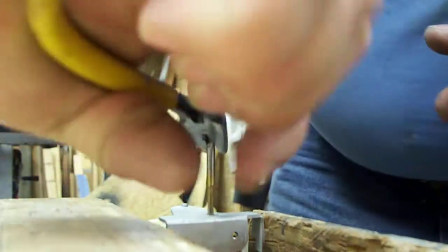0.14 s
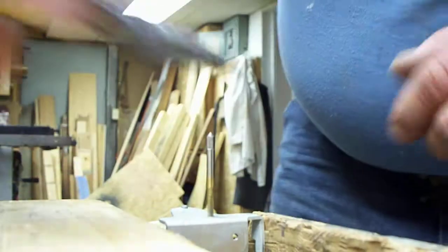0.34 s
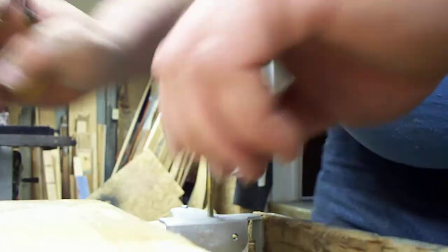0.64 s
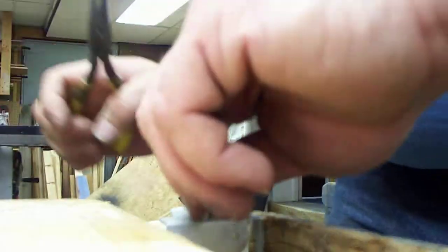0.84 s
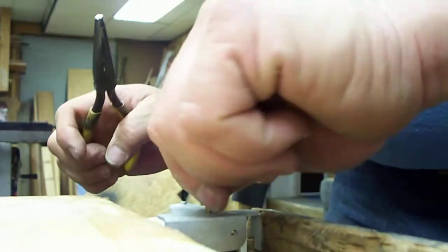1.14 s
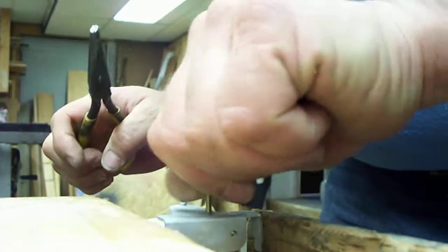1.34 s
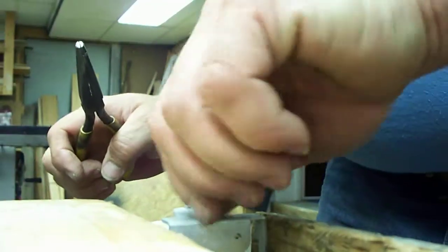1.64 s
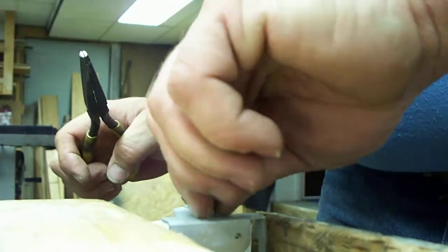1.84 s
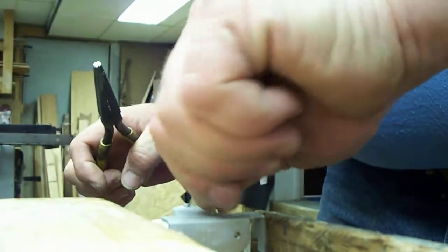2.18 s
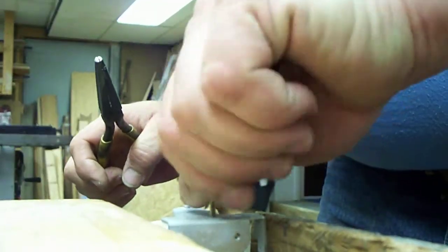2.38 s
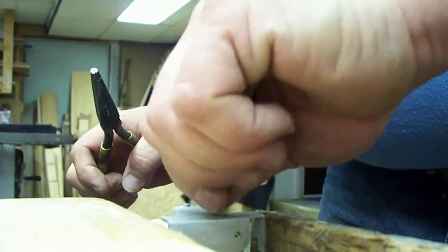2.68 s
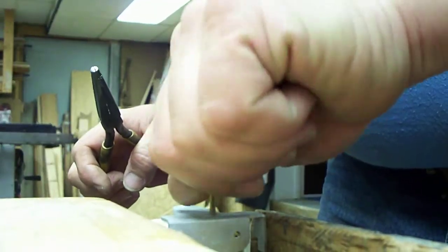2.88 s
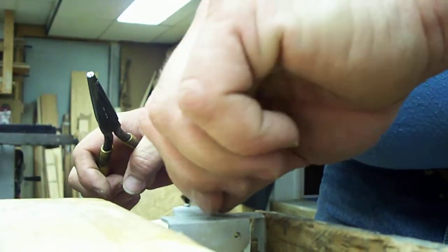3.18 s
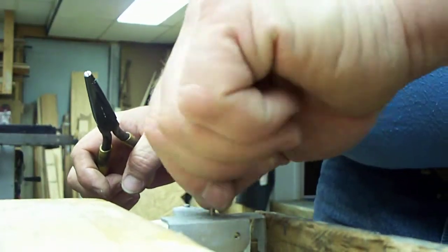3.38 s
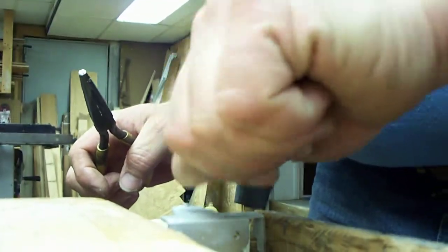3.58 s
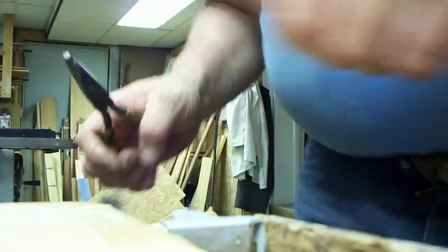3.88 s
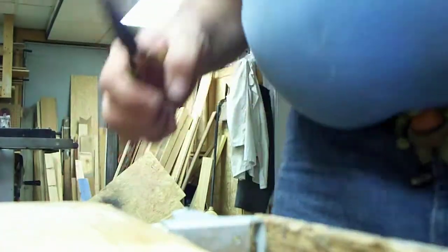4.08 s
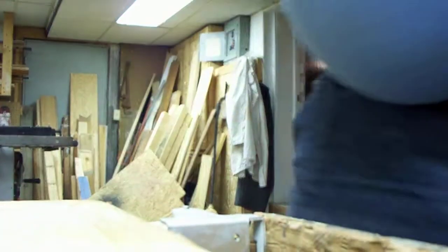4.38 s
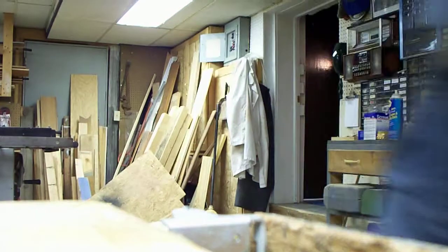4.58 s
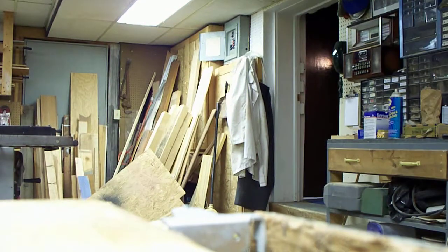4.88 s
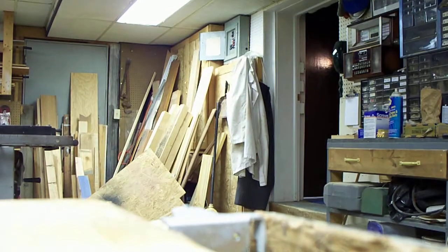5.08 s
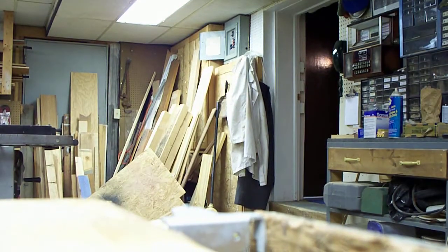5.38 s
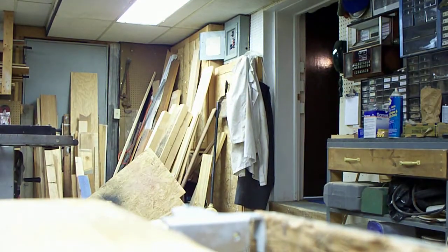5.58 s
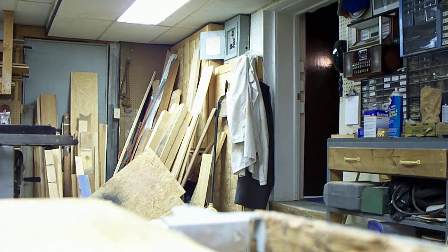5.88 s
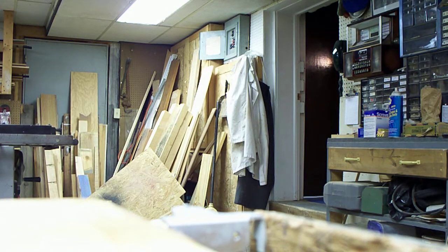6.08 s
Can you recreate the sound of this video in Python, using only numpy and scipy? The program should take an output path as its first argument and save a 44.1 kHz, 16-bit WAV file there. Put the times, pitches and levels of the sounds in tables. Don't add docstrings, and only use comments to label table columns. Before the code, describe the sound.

Sparse steel clicks and gritty scrapes rattle a thin metal box in a small, fairly dry workshop, amid soft rubbing and cloth rustle. The cheap close microphone adds irregular ticking interference, hum and thin whine. After some faint ticks, one tool hits the bench far louder than anything before, bouncing and ringing briefly. Everything then grows quieter until hollow wooden knocks and rustling arrive from across the room.

```python
import sys
import numpy as np
from scipy import signal
from scipy.fft import rfft, irfft, next_fast_len
from scipy.io import wavfile
from scipy.ndimage import uniform_filter1d, map_coordinates

SR = 44100
rng = np.random.default_rng(int(sys.argv[2]) if len(sys.argv) > 2 else 0)


def dump(signal):
    limited = np.clip(np.atleast_2d(signal).T, -1, 1)
    pcm = np.round(limited * 32767).astype(np.int16)
    wavfile.write(sys.argv[1], SR, pcm)


def gain_from_decibels(decibels):
    exponent = np.asarray(decibels, float) / 20
    return 10 ** exponent


N = 274743

# start in seconds, peak level in dB, bench level relative in dB,
# ring frequency in Hz, t60 in seconds
DROP_HITS = [
    (4.9973, -13.5, -6.5, 7000, 0.014),
    (4.9990, -9.5, -8, 6200, 0.019),
    (5.005, -28, 13, 6900, 0.078),
    (5.0118, -35.5, 13.5, 7000, 0.18),
    (5.0194, -34, 17.5, 7550, 0.062),
    (5.0232, -21.5, 2, 7700, 0.025),
    (5.040, -31, 5, 7400, 0.12),
]
# middle in seconds, length in seconds, rub rise in dB, rustle rise in dB
MOVES = [(0.087, .25, 0, 8), (0.671, .2, 4.5, 5.5), (1.364, 0.41, 3.5, 5.5), (2.13, 0.28, 3.5, 3),
         (2.992, 0.11, 2.5, 4.5), (3.493, 0.17, 3.5, 4.5), (4.03, 0.38, 5.5, 4), (4.357, 0.21, 8.5, 5),
         (4.599, 0.22, 10.5, 10), (4.913, 0.22, 6.5, 6), (6.11, 0.19, 13, 9)]


def unit(x):
    return x / np.sqrt(np.mean(x ** 2) + 1e-20)


def along(points, hz):
    f, v = np.transpose(points)
    return np.interp(np.log(hz + 1), np.log(f + 1), v)


def wobble(rate):
    knots = rng.standard_normal(int(N * rate / SR) + 4)
    return map_coordinates(knots, [np.arange(N) * rate / SR])


def filtered(x, response):
    m = next_fast_len(len(x) + 8192)
    return irfft(rfft(x, m) * response(np.fft.rfftfreq(m, 1 / SR)), m)[:len(x)]


def modes(table, turn=-1):
    def resonance(f, hz, width, db):
        return gain_from_decibels(db) * 1j * f * width / (hz * hz - f * f + 1j * f * width)
    return lambda f: sum(turn ** k * resonance(f, *row) for k, row in enumerate(table))


def add(track, s, piece):
    part = track[round(s * SR):][:len(piece)]
    part += piece[:len(part)]


def swells(rows):
    clock = np.arange(N) / SR
    return sum(db * np.exp(-((clock - s) / (length / 2)) ** 2) for s, length, db in rows)


def ducking_db():
    duck_db, fall_s = -7, .15
    return duck_db * np.clip((np.arange(N) / SR - DROP_HITS[0][0]) / fall_s, 0, 1)


def gain_return_db():
    start_s, rise_db = 6.013, 5
    return rise_db * (np.arange(N) / SR > start_s)


def room(x):
    # frequency in Hz, t60 in seconds
    decay = [(200, 0.14), (1500, 0.078), (7000, 0.26)]
    hz, t, z = signal.stft(rng.standard_normal(SR // 2), SR, nperseg=256)
    fade = gain_from_decibels(-60 * t / along(decay, hz)[:, None])
    tail = signal.istft(z * fade, SR, nperseg=256)[1]
    return signal.fftconvolve(np.pad(x, (200, 0)), tail / np.linalg.norm(tail))[:N]


def rush(spectrum, patchy_db):
    z = signal.stft(rng.standard_normal(N), nperseg=256)[2]
    field = uniform_filter1d(rng.standard_normal(z.shape), size=4, axis=0)
    field = uniform_filter1d(field, size=6, axis=1)
    x = signal.istft(z * gain_from_decibels(patchy_db * unit(field)), nperseg=256)[1][:N]
    return unit(filtered(x, lambda hz: gain_from_decibels(along(spectrum, hz))))


def rings(table):
    waver_per_s, beat_db, drift_rad = 130, 2.5, .7
    out, t = np.zeros(N), np.arange(SR // 5) / SR
    for s, hz, db, t60 in table:
        knots = rng.standard_normal((2, 40))
        beat, drift = [np.interp(t, np.arange(40) / waver_per_s, row) for row in knots]
        level = gain_from_decibels(db + beat_db * beat - 60 * t / t60)
        ring = level * np.sin(2 * np.pi * hz * t + drift_rad * (drift - drift[0]))
        add(out, s, ring * (1 - np.exp(-t / 0.0006)))
    return out


def contact(db, body_db, rise, t60, body, kick, ring_hz=6900):
    # frequency in Hz, width in Hz, level in dB
    steel_modes = [(3320, 500, -6.5), (4904, 270, 1.5), (5700, 460, 4), (6900, 1200, 1), (7786, 250, 2.5)]
    t = np.arange(SR // 5) / SR
    lasts = max(t60, .004) * np.array([[.6], [1.1]])
    swell = np.minimum(t / max(rise, 1e-4), 1) ** 2 * gain_from_decibels(-60 * np.maximum(t - rise, 0) / lasts)
    force = swell * rng.standard_normal((2, len(t)))
    grains = np.repeat(rng.standard_normal(len(t) // 40 + 1), 40)[:len(t)]
    force *= gain_from_decibels(3.0 * grains)
    force[0, 4] += 0.86 * kick
    force[1, 4:20] += .22 * kick * np.hanning(16)

    def steel(f):
        return modes(steel_modes)(f) * (1 + modes([(ring_hz, 500, 3)])(f))

    def panel(f):
        soft = 1 / (1 + 1j * f / 3500 - (f / 2800) ** 2)
        leak = (1j * f / (1j * f + 0.75 * body[0][0])) ** 2
        return modes(body, turn=1)(f) * soft ** 2 * leak

    bright, dull = filtered(force[0], steel), filtered(force[1], panel)
    return gain_from_decibels(db) * (bright / np.abs(bright).max() + gain_from_decibels(body_db) * dull / np.abs(dull).max())


def spike_times():
    routine = [0.0048, 0.0134, 0.0402, 0.1076, 0.1268, 0.204, 0.2136, 0.2746, 0.2836, 0.3074, 0.3396,
               0.3828, 0.3942, 0.4052, 0.4408, 0.5074, 0.5138, 0.5414, 0.572, 0.5922, 0.6048, 0.707, 0.741,
               0.783, 0.805, 0.8398, 0.9064, 0.9164, 0.9408, 0.9934]
    # start in seconds, number of spikes, gap in seconds
    runs = [(0.2407, 2, 0.0075), (0.3753, 6, 0.0093), (0.5099, 1, 0.009), (0.5283, 1, 0.0075),
            (0.6505, 2, 0.0086), (0.674, 3, 0.0097), (1.0449, 1, 0.009), (1.2379, 3, 0.0085),
            (1.3751, 3, 0.0093), (1.9444, 1, 0.009), (2.0435, 1, 0.009), (2.1931, 2, 0.0132),
            (2.3065, 3, 0.0093), (2.7473, 4, 0.012), (3.0039, 2, 0.0115), (3.4586, 1, 0.01),
            (3.4807, 2, 0.01), (3.5068, 3, 0.0093), (3.6078, 2, 0.0075), (3.909, 2, 0.0023),
            (3.9917, 5, 0.0093), (4.1415, 2, 0.0093), (4.2085, 1, 0.009), (4.6036, 3, 0.01),
            (4.6921, 3, 0.011), (4.8185, 4, 0.0093), (4.8715, 3, 0.0093), (5.2379, 2, 0.0075),
            (5.3712, 3, 0.0075), (5.7038, 3, 0.0075), (5.8097, 2, 0.0085), (6.0019, 2, 0.01)]
    # start in seconds, length in seconds
    idle = [(.1, .04), (.272, .071), (.565, .01), (.78, .028), (.988, .01), (1.198, .01), (1.334, .01),
            (1.587, .01), (1.702, .01), (2.278, .01), (2.388, .01), (2.586, .012), (3.035, .01),
            (3.535, .01), (.536, .01), (3.335, .049), (3.565, .01), (4.378, .008), (4.435, .008),
            (4.508, .008), (4.778, .028), (4.91, .008), (5.269, .039), (5.434, .008), (5.566, .026)]
    # first time in seconds, number of times
    chore_rows = [(1.494, 2), (1.6392, 2), (1.8124, 2), (2.244, 2), (2.7164, 2), (2.948, 1), (3.2925, 2),
                  (4.7478, 2)]
    strays = [.0739, .35, .5422, .5778, .726, .809, .849, 1.1394, 1.22, 1.291, 1.316, 1.352, 1.4111, 1.748,
              1.772, 1.987, 2.023, 2.092, 2.118, 2.1419, 3.0395, 3.0721, 3.1388, 3.342, 3.449, 3.7745,
              3.7928, 3.891, 3.9229, 3.9489, 4.091, 4.115, 4.225, 4.3245, 4.416, 4.481, 4.4895, 4.52,
              4.6437, 5.318, 5.348, 5.577, 5.771]
    period_s, busy_s, jitter_s = .9995, .012, .0002
    steps = np.add.outer(period_s * np.arange(7), routine).ravel()
    steps = steps + jitter_s * rng.standard_normal(len(steps))
    pauses = list(idle) + [(s - busy_s, (count - 1) * gap + 2 * busy_s) for s, count, gap in runs]
    free = [s for s in steps if s < N / SR and not any(a < s < a + length for a, length in pauses)]
    chores = [s + k * period_s for s, times in chore_rows for k in range(times)]
    extra = [s + k * gap for s, count, gap in runs for k in range(int(count))]
    return np.array(free + chores + list(strays) + extra)


def hum(spike_s):
    # frequency in Hz, density in dB per Hz
    spectrum = [(12, -53.5), (20, -14), (48, 1), (92, 5.5), (280, -3), (510, 2.5), (670, -7.5),
                (1100, -16.5), (1200, -12), (1560, -38), (2640, -120)]
    # frequency in Hz, width in Hz, level in dB
    air_modes = [(60, 4, -4.5), (238.1, 10, -0.5), (410.4, 23, -1.5)]
    # middle in seconds, length in seconds, rise in dB
    nudges = [(.125, 0.089, 11.5), (1.2, 0.06, 8), (2.2, 0.1, 5.5), (2.75, 0.14, 1.5), (6.18, 0.38, 2.5)]
    level_db = -59 + ducking_db() + 1.3 * gain_return_db() + swells(nudges)
    spikes = np.bincount(np.round(spike_s * SR).astype(int), minlength=N)
    load = np.minimum(signal.fftconvolve(spikes, np.hanning(2000), "same"), 1)
    sag_db = 6 * (load - .8) + 0.5 * wobble(30)
    air = unit(filtered(rng.standard_normal(N), lambda f: modes(air_modes)(f) ** 2))
    return gain_from_decibels(level_db - 0.5 + sag_db) * (rush(spectrum, patchy_db=0.5) + gain_from_decibels(-6.0) * air)


def rubbing_hands():
    # frequency in Hz, density in dB per Hz
    spectrum = [(410, -21.5), (700, -5), (1770, -11.5), (2030, -13), (2830, -18.5), (3450, -19.5),
                (4300, -38), (5590, -76), (9460, -120)]
    level_db = -65.5 + 0.51 * ducking_db() + 0.84 * gain_return_db()
    level_db = level_db + swells([row[:3] for row in MOVES])
    return gain_from_decibels(level_db + 1.8 * wobble(45)) * rush(spectrum, patchy_db=1.5)


def rustling_clothes():
    # frequency in Hz, density in dB per Hz
    spectrum = [(2410, -52.5), (4100, -15.5), (4280, -12.5), (4690, -8.5), (5320, -4), (6070, -2),
                (6760, 0), (8000, -2), (10400, -39.5), (17600, -120)]
    level_db = -70.5 + .7 * ducking_db() + .8 * gain_return_db()
    level_db = level_db + swells([(s, length, db) for s, length, _, db in MOVES])
    return gain_from_decibels(level_db + 0.32 * wobble(22)) * rush(spectrum, patchy_db=-2.5)


def whine():
    # frequency in Hz, level in dB
    tones = [(7777, -99), (7837, -74), (7897, -85.5)]
    clock, cycle_s = np.arange(N) / SR, .128
    cycle = np.cos(2 * np.pi * (clock - .004) / cycle_s)
    busy = 1 / (1 + np.exp(-2.5 * (cycle + .5 + .5 * wobble(20))))
    steady = sum(gain_from_decibels(db + 4) * np.sin(2 * np.pi * hz * clock) for hz, db in tones)
    return busy * gain_from_decibels(ducking_db()) * steady


def supply_blips(spike_s):
    faint = [.1841, .1686, 1.426, 1.1893, 2.1787, 2.4263, 2.4788, 2.6629, 2.6921, 2.8924, 2.9229, 3.0923,
             3.326, 3.811, 3.8245, 4.1321, 4.1764, 4.1868, 4.6684]
    # start in seconds, peak level in dB
    volleys = [(0.048, -41), (0.5513, -36), (0.938, -44.5), (1.038, -47), (1.55, -46), (2.037, -39.5),
               (2.551, -42), (3.047, -42.5), (3.5405, -36.5), (4.039, -36.5), (4.537, -38)]
    spike_db, duck_depth = -38.8, 1.25
    back_s, back_db = 5.995, 4.5
    t = np.arange(-40, 200) / SR
    pulse = 1.15 * np.exp(-np.abs(t / np.where(t < 0, .00017, .0002)) ** 1.8)
    rebound = .7 * (t > -.0002) * np.exp(-.5 * ((t - .00085) / .00047) ** 2)
    blip = pulse - rebound
    out = np.zeros(N)
    size_db = spike_db + duck_depth * ducking_db() + back_db * (np.arange(N) / SR > back_s)
    for s in spike_s:
        add(out, s + t[0], gain_from_decibels(size_db[round(s * SR)] + rng.normal(0, .8)) * blip)
    for s in faint:
        add(out, s + t[0], gain_from_decibels(spike_db - 7.5) * blip)
    for s, db in volleys:
        for k in range(4):
            add(out, s + t[0] + k * .0021, gain_from_decibels(db - 1.5 + rng.normal(0, 1.2)) * blip)
    return filtered(out, lambda f: 1.1 * f * f / (f * f + 90 ** 2) / (1 + (f / 3800) ** 4))


def far_knocks():
    # start in seconds, peak level in dB, edge level relative in dB, t60 in seconds
    knocks = [
        (1.69, -57, -24, 0.025),
        (4.654, -49, -21, 0.028),
        (6.046, -41.5, -28, 0.069),
        (6.103, -58, -28, 0.049),
        (6.1362, -35, -27, 0.046),
        (6.207, -35, -26, 0.038),
    ]
    # frequency in Hz, width in Hz, level in dB
    wood = [(803, 160, 11), (1240, 79, 8.5), (1500, 79, 5), (1830, 160, 1), (2490, 38, -27)]
    out = np.zeros(N)
    for s, db, edge_db, t60 in knocks:
        add(out, s, contact(db + edge_db + 3, -edge_db, .001, t60, wood, kick=9.0))
    return out


def murmurs():
    # middle in seconds, length in seconds, frequency in Hz, level in dB
    tones = [(2.41, .06, 388, -54.5), (2.493, 0.062, 406, -52.5), (2.657, 0.054, 404.7, -53.5),
             (2.763, 0.031, 414, -50), (2.949, 0.03, 408, -51), (3.049, 0.03, 398.4, -45.5),
             (3.057, 0.037, 265, -53), (3.791, 0.0077, 619, -40.5), (3.923, 0.011, 497, -42),
             (4.49, 0.012, 480, -48), (1.183, 0.0061, 1198, -37.5), (3.612, 0.041, 386, -53.5),
             (4.37, 0.079, 225.4, -54)]
    clock, out = np.arange(N) / SR, np.zeros(N)
    for s, length, hz, db in tones:
        swell = np.exp(-((clock - s) / (length / 2)) ** 2)
        out += gain_from_decibels(db) * swell * np.sin(2 * np.pi * hz * clock)
    return out


def scrapes():
    # start in seconds, peak level in dB, box level relative in dB,
    # rise in seconds, t60 in seconds
    slides = [(0.085, -46.5, 0.5, 0.006, 0.24), (0.1075, -38, -13, 0.0019, 0.028),
              (0.133, -31, -14.5, 0.003, 0.063), (0.1376, -30, -11.5, 0.0028, 0.036),
              (1.1765, -32.5, -8.5, 0.0033, 0.038), (1.972, -36, -6, 0.0054, 0.045),
              (2.1515, -29, -6, 0.008, 0.045), (2.557, -40, -4.5, 0.00093, 0.047),
              (2.639, -33.5, -7.5, 0.011, 0.041), (2.754, -34, -9.5, 0.0031, 0.05),
              (2.7675, -39.5, -9, 0.0034, 0.053), (2.83, -45, -11, 0.005, 0.08),
              (3.345, -27, -8.5, 0.0069, 0.061), (3.357, -33.5, -14, 0.0047, 0.04)]
    # start in seconds, peak level in dB,
    # box level relative in dB, t60 in seconds
    brushes = [(0.7016, -53, -17, 0.057), (0.84, -54, 1, 0.043), (1.056, -45.5, -4.5, 0.023),
               (1.161, -48.5, 0, 0.041), (1.465, -50, -21, 0.044), (1.763, -51.5, -1, 0.095),
               (2.2764, -65, -16, 0.041), (2.5774, -49, -6, 0.044), (2.9424, -54, 2.5, 0.017),
               (3.035, -53, 3.5, 0.057), (3.159, -56, -2, 0.051), (3.3988, -47.5, -2, 0.032),
               (3.4309, -51, 3.5, 0.15), (3.4385, -45, 0.5, 0.1), (3.4646, -48, -2, 0.013),
               (3.468, -57, 3, 0.048), (3.9266, -47.5, 0.5, 0.02), (6.0185, -48.5, -6, 0.029)]
    # frequency in Hz, width in Hz, level in dB
    rattle = [(935, 180, 7.5), (1250, 330, 12.5), (1687, 99, 9.5), (2420, 66, -7), (2750, 134, -2.5),
              (3600, 230, -9.5)]
    out = np.zeros(N)
    for s, db, box_db, rise, t60 in slides:
        add(out, s, contact(db + .5, box_db + 4.0, rise, t60, rattle, kick=0.0, ring_hz=6740))
    for s, db, box_db, t60 in brushes:
        add(out, s, contact(db + .5, box_db + 4.0, .0024, t60, rattle, kick=0.0, ring_hz=7400))
    return out


def snaps():
    # start in seconds, peak level in dB, box level relative in dB,
    # ring frequency in Hz, t60 in seconds
    sharp = [(0.0319, -37.5, -13.5, 6900, 0.0081), (0.0604, -44.5, -7, 7000, 0.017),
             (0.077, -26.5, -8.5, 6900, 0.041), (0.8172, -34.5, 1, 5700, 0.029),
             (1.4475, -32.5, 1.5, 5700, 0.023), (1.9503, -31, -1.5, 5560, 0.024),
             (2.1588, -26.5, -10.5, 6500, 0.055), (2.2517, -32, -1, 5400, 0.023),
             (3.6395, -30.5, -1.5, 5470, 0.015), (3.6445, -47, 11, 5700, 0.014),
             (3.9175, -65, 15, 5870, 0.018), (6.0473, -47, 5.5, 6970, 0.038)]
    # start in seconds, peak level in dB, box level relative in dB
    ticks = [(0.2648, -51, -14), (1.3679, -50, -4.5), (1.9025, -63, -4), (4.217, -61, 20.5),
             (4.2694, -42.5, -16), (4.2975, -51, -17), (4.3321, -49, -5), (4.3424, -48.5, -3),
             (4.3918, -48.5, -13), (4.531, -51, 10.5), (4.5626, -55, 5), (4.586, -49, -5),
             (6.0141, -52, -3), (4.3478, -50.5, -4), (4.3815, -51.5, -8), (4.315, -53.5, -6),
             (4.572, -52.5, 0), (4.582, -52.5, 1)]
    # frequency in Hz, width in Hz, level in dB
    box = [(563, 120, -2), (1307, 140, 9.5), (1580, 150, 10), (1844, 130, 6.5), (2076, 140, 8.5),
           (2570, 130, -3), (3180, 270, 2)]
    out = np.zeros(N)
    for s, db, box_db, ring_hz, t60 in sharp:
        add(out, s, contact(db + 2.5, box_db + 7, .0006, t60, box, kick=14.0, ring_hz=ring_hz))
    for s, db, box_db in ticks:
        add(out, s, contact(db + 1.5, box_db + 7, .0003, .014, box, kick=12.0, ring_hz=7000))
    return out


def tap():
    # start in seconds, frequency in Hz, level in dB, t60 in seconds
    jaws = [(.139, 6519, -38, .08), (.139, 7020, -41, .08), (.118, 4800, -50, .04), (.153, 620, -45, .1),
            (.108, 280, -44, .09), (.136, 470, -44, .05), (1.976, 6600, -44, .05), (5.1, 575, -58, .3),
            (.262, 1380, -59, .15), (1.18, 250, -48, .2), (.078, 2710, -32, .025), (3.917, 1400, -33, .022),
            (6.058, 7250, -60, .12), (6.095, 7300, -61, .15)]
    # start in seconds, frequency in Hz, level in dB, t60 in seconds
    wall = [(.8173, 1300, -31, 0.042), (.8173, 1950, -29, .03), (1.44784, 2090, -27, .022),
            (1.4478, 1800, -32.5, 0.028), (1.9503, 1290, -33.5, 0.047), (2.252, 1330, -35.5, 0.037),
            (2.252, 1530, -33.5, 0.038), (2.252, 2150, -35.5, 0.029), (3.6396, 1330, -34, .025),
            (3.6394, 1930, -31, .025), (3.6446, 1600, -34, 0.018), (1.9503, 1600, -37, .03),
            (1.9503, 2000, -37, 0.029), (6.048, 1700, -40, .03), (6.051, 500, -40.5, .03),
            (6.138, 780, -45, 0.11), (2.1595, 2730, -30.5, 0.028), (2.165, 2350, -43, .05),
            (2.159, 5770, -35.5, .03), (2.159, 4400, -39, .03), (2.159, 950, -40, 0.053),
            (2.161, 6590, -39.5, .05), (.134, 7900, -36.5, .04), (.0775, 1300, -37, 0.022),
            (.0775, 1730, -31, .035), (.078, 5800, -40, .04), (3.359, 2900, -39, 0.044),
            (3.464, 2850, -50, .05), (6.136, 1870, -39.5, 0.018), (6.207, 1700, -40, .02),
            (2.166, 295, -44.5, .08), (3.352, 1220, -42, 0.052), (3.352, 1750, -44, .04),
            (2.756, 1750, -42, 0.057)]
    out = far_knocks() + murmurs() + scrapes() + snaps() + rings(jaws) + rings(wall)
    return out + gain_from_decibels(-21) * room(out)


def dropped_tool():
    # start in seconds, frequency in Hz, level in dB, t60 in seconds
    lid = [(5.0055, 1390, -16, 0.12), (5.011, 1385, -18.5, 0.11), (4.998, 1650, -27, .03),
           (5.03, 1100, -28, .08), (5.026, 2310, -33.5, .1), (5.016, 215, -33.5, .14),
           (5.01, 330, -33, .12), (5.0, 540, -30, .08), (5.03, 410, -34, .12), (5.006, 1040, -25, .09),
           (5.016, 651, -26, .12), (5.0195, 765, -20.5, .1), (5.012, 980, -30, .07), (5.02, 1190, -25, .12),
           (5.004, 2070, -28, 0.13), (5.004, 2600, -35, .08), (4.998, 3380, -27.5, 0.047),
           (5.036, 3800, -44, .05), (4.998, 6990, -21, .05), (5.023, 7600, -25.5, 0.036)]
    # frequency in Hz, width in Hz, level in dB
    bench = [(206, 24, -4.5), (325, 46, -2), (526, 97, -3.5), (650, 37, -0.5), (760, 74, 4.5),
             (1035, 130, -2.5), (1200, 76, -0.5), (1384, 26, 3), (1540, 40, -18), (1744, 30, -14),
             (2080, 30, -10.5), (2300, 50, -23), (2800, 180, -21.5), (3300, 200, -19.5)]
    out = rings(lid)
    for s, db, bench_db, ring_hz, t60 in DROP_HITS:
        add(out, s, contact(db + 1.5, bench_db, .0005, t60, bench, kick=5.0, ring_hz=ring_hz))
    out = out + gain_from_decibels(-9.0) * room(out)
    return filtered(out, lambda f: (1j * f / 185) ** 2 / (1 + 1j * f / 150 - (f / 185) ** 2))


def scene():
    spike_s = spike_times()
    background = hum(spike_s) + rubbing_hands() + rustling_clothes()
    circuits = whine() + supply_blips(spike_s)
    return (background + circuits + tap() + dropped_tool())[None]


def top_cut(x):
    return signal.sosfilt(signal.butter(12, 9400, fs=SR, output="sos"), x)


def record(dry):
    half_rate_hz = 8000
    # frequency in Hz, level in dB
    smoothing = [(7000, -1.0), (7800, -1.0), (8200, -7.5), (8700, -22.5), (9100, -45.0), (9400, -67), (9800, -140)]

    def notch(f):
        return (4200 ** 2 - f * f + 1j * f * 250) / (4200 ** 2 - f * f + 1j * f * 900)

    clean = filtered(dry[0], notch)
    heard = clean / (1 + np.maximum(-clean / .3, 0) ** 5) ** (1 / 5)
    heard = heard - filtered(heard - clean, lambda f: 1 / (1 + (f / 260) ** 6))
    band = filtered(heard, lambda f: 1 / np.sqrt(1 + (f / half_rate_hz) ** 100))
    band = band + gain_from_decibels(-82.0) * filtered(rng.standard_normal(N), lambda f: 1. * (f < half_rate_hz))
    mirror = 2 * band * np.cos(4 * np.pi * half_rate_hz * np.arange(N) / SR)
    both = band + filtered(mirror, lambda f: 1. * (f < 1.5 * half_rate_hz))
    out = filtered(both, lambda f: gain_from_decibels(along(smoothing, f)) * (f < 1.2 * half_rate_hz))
    out = out + gain_from_decibels(-101) * rng.standard_normal(N)
    return top_cut(out[None])


dry = scene()
out = record(dry)
dump(out)
```